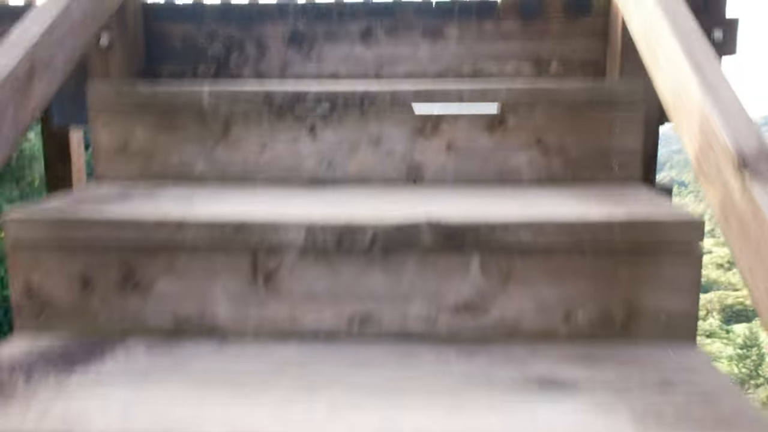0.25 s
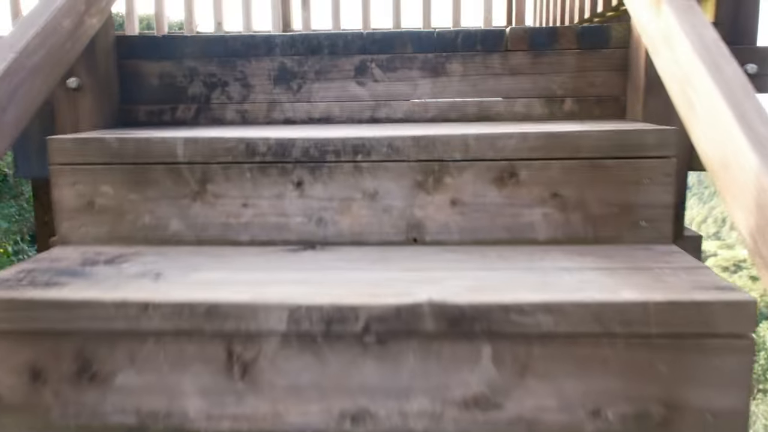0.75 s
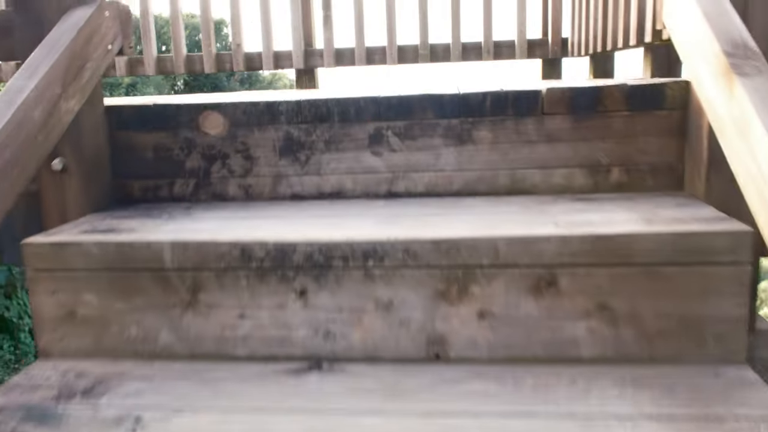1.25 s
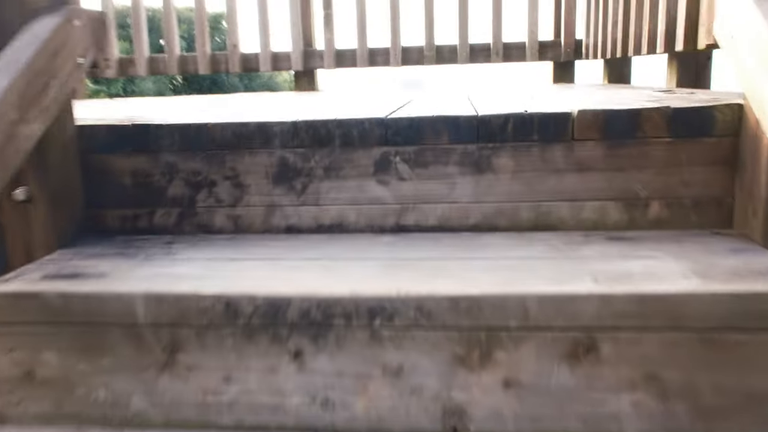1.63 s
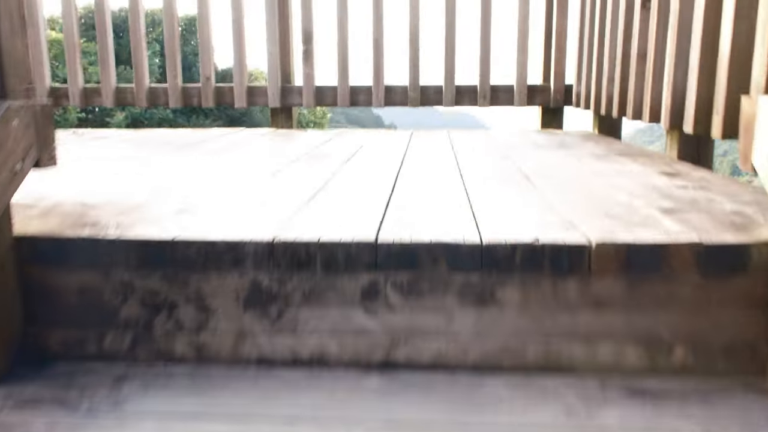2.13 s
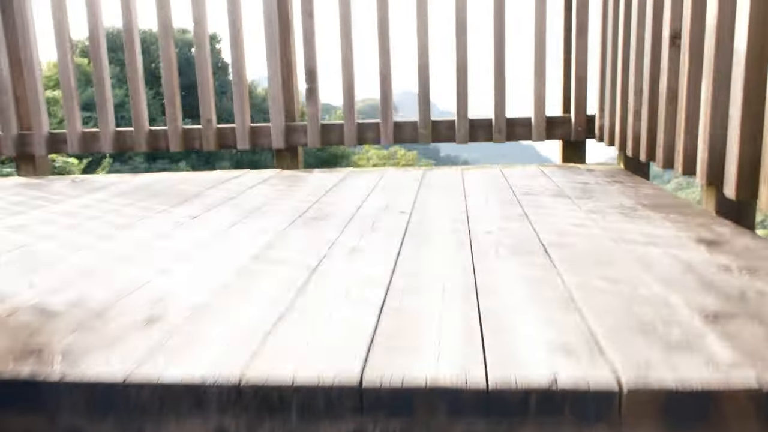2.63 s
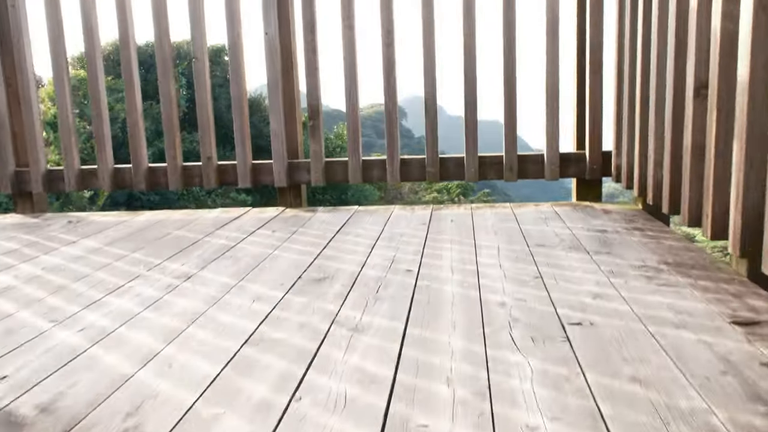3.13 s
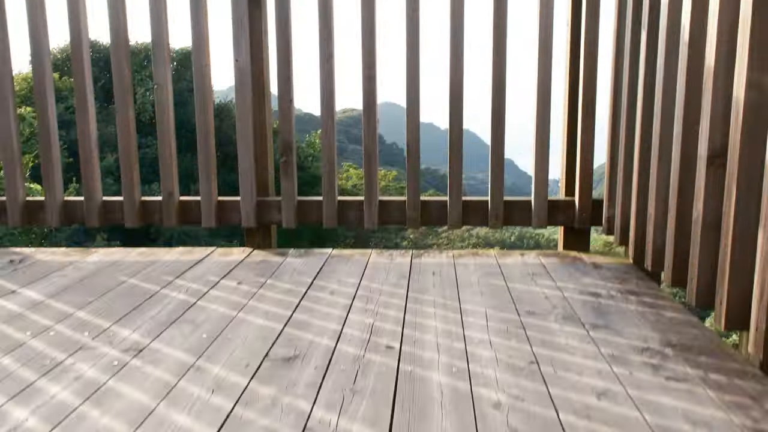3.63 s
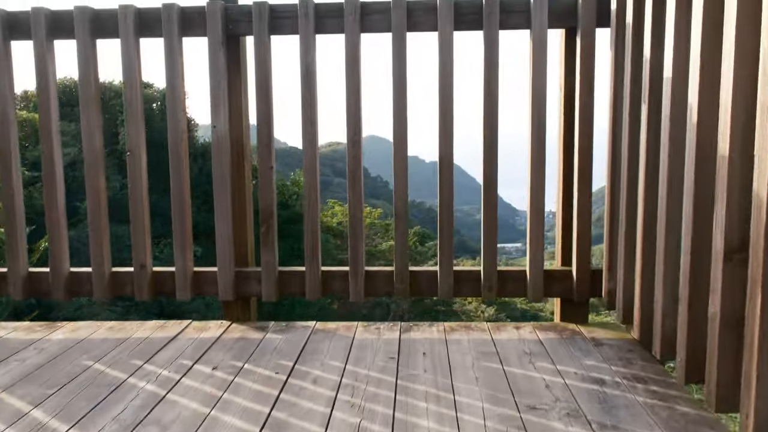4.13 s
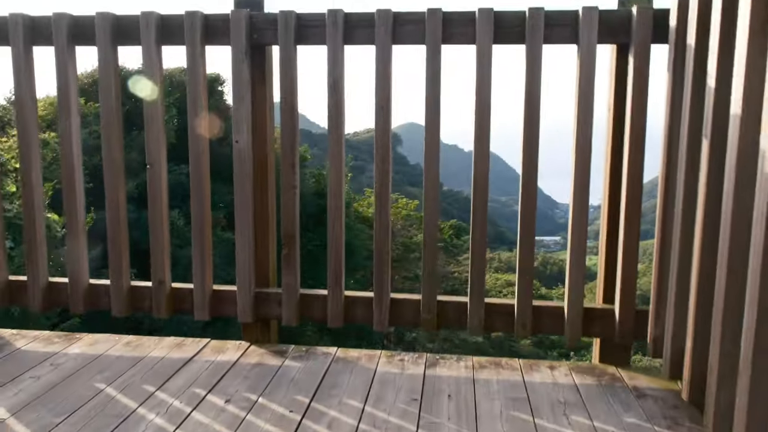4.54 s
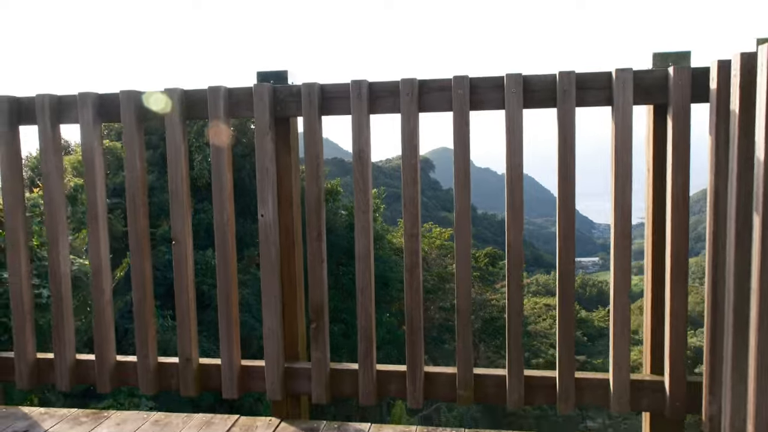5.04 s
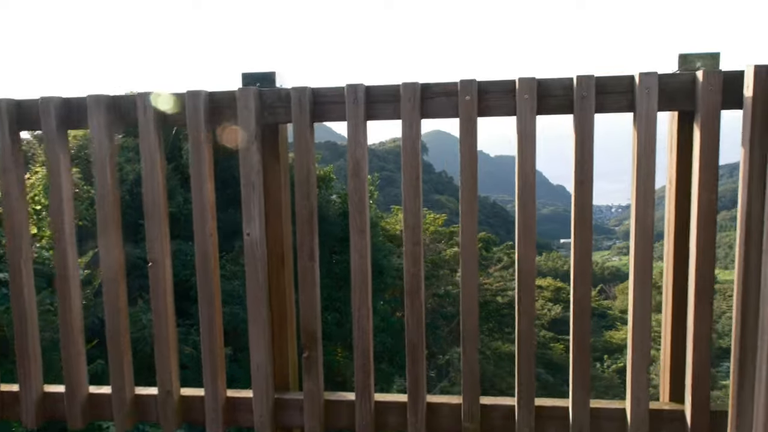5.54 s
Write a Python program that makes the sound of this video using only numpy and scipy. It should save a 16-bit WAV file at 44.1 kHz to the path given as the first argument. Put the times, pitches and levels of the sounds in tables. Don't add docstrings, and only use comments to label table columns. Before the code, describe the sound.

A continuous, bright wall of cicadas lasts the whole six seconds: mid-range drone, hissing buzz, very high whine and rasping bursts, with quick rising calls and small chirps mostly in the first three seconds. A faint scuff on wood comes at 0.1 s, then a heavy, rolling, hollow step on a stair at 0.7 s, with low joist resonance. A light touch leads into a firm step at 1.55 s; a faint brush at 2.2 s precedes the brightest, grittiest knock at 2.36 s. Light scuffs follow around 2.5 to 2.7 s. On the deck, softer steps land at 3.25 and 4.2 s, the latter heel then toe, and a clearer plank step at 5.2 s, with faint scuffs at 5.4 and 5.8 s. A thin, very high ticking insect stops about 4.6 s. A throbbing trill swells from 4.3 to 5.2 s, while another enters near 5 s and continues. The outdoor space is dry, with close, carried-microphone footsteps.

```python
import sys
import numpy as np
from scipy import signal
from scipy.fft import rfft, irfft, next_fast_len
from scipy.io import wavfile
from scipy.ndimage import uniform_filter1d

SR = 44100
rng = np.random.default_rng(int(sys.argv[2]) if len(sys.argv) > 2 else 0)


def file_out(sig):
    cols = np.atleast_2d(sig).T
    lim = np.clip(cols, -1, 1)
    pcm = np.round(lim * 32767).astype(np.int16)
    wavfile.write(sys.argv[1], SR, pcm)


def voltage_ratio(level):
    return 10 ** (np.asarray(level, float) / 20)


N = 255335

# frequency in Hz, density in dB per Hz.
DRONE_SPECTRUM = [(680, -19), (1150, -11.5), (1380, -3.5), (1540, 4.5), (2580, 1.5), (3110, 2.5), (3470, 0),
                  (4000, -3), (5200, -23), (8800, -120)]
BUZZ_SPECTRUM = [(2290, -32), (3900, -8), (5130, 1), (5800, -1), (7050, -7.5), (7560, -12), (8000, -15),
                 (10400, -24), (17600, -120)]
WHINE_SPECTRUM = [(6500, -12.5), (8000, -5), (8700, 0), (9050, 5), (9450, -1.5), (10100, -5), (11000, -6),
                  (12500, -4), (15000, -46)]
RASP_SPECTRUM = [(9000, -28.5), (11000, -13), (12500, -11.5), (14100, -4.5), (15000, -9), (15700, -10)]
# frequency in Hz, density in dB per Hz.
AIR_SPECTRUM = [(30, -4.5), (45, 8), (110, -1.5), (160, -17), (300, -14), (700, -19.5), (1200, -21.5),
                (1500, -69), (2500, -80)]
SWAY_SPECTRUM = [(4, -22), (10, -7), (17, 0.5), (22, -10.5), (28, -16.5), (40, -54), (80, -100)]

# frequency in Hz, width in Hz, level in dB.
FOOTFALLS = [
    ([(0.13, -24.5, 1.6, 0.037)], [(390, 37, -1), (550, 65, 2), (680, 58, 1.5), (900, 170, 1), (1500, 400, -12)]),
    ([(.7185, -12, 2, 0.0048), (.7202, -12, 3.1, 0.008), (.7228, -11.5, 1.6, 0.005), (.7315, -18, 2.8, .004), (.7365, -13, 0.93, 0.021), (.7405, -28, 1.8, 0.012), (.7475, -18, 2.7, 0.0061), (.7635, -28, 4, .005)], [(213, 98, -4.5), (345, 65, 5), (420, 60, -3), (476, 29, 0.5), (610, 82, -5), (705, 37, -10), (780, 63, -13), (930, 44, 4), (1200, 110, -6), (1415, 69, 4.5), (1860, 160, -2), (2460, 340, -1.5), (3460, 760, -6)]),
    ([(1.464, -30.5, 1.2, 0.015)], [(507, 44, -2), (815, 120, 9), (1040, 150, 7)]),
             ([(1.5443, -17, 2, 0.003), (1.548, -21, 0.98, 0.0054), (1.5555, -16, 1.6, 0.0059), (1.56, -14, 0.73, 0.0048), (1.5665, -24, 1.8, 0.008), (1.572, -36, 2.7, 0.0072)], [(251, 27, 2.5), (338, 61, 1.5), (420, 62, -1), (543, 48, 4.5), (592, 87, -1), (975, 140, 1), (1530, 230, 5), (1830, 210, 6), (2300, 300, 0), (2900, 400, -7)]),
    ([(2.187, -37.5, 2.6, 0.006)], [(300, 120, 4), (420, 120, 2)]),
    ([(2.36, -13.5, 1.1, 0.0025), (2.3648, -12.5, 0.55, 0.0051), (2.3685, -10.5, 0.59, 0.0035), (2.3715, -16, 0.98, 0.0073), (2.376, -24, 1.5, .005), (2.3805, -15, 1.4, 0.003), (2.3875, -28, 2.2, .005), (2.3925, -22.5, 1.7, .005), (2.398, -28, 2.8, 0.0089), (2.411, -34, 3.4, 0.0057)], [(353, 26, -9), (457, 34, 2), (510, 56, 2), (615, 77, 6), (703, 75, 5.5), (816, 81, 6), (877, 42, 7.5), (954, 80, 10.5), (1220, 150, 2), (1690, 440, 2.5), (2710, 240, -1), (4100, 1200, -9)]),
             ([(2.519, -36, 3, 0.008), (2.657, -28, 0.85, 0.011)], [(900, 130, 3.8), (1190, 330, 9.4)]),
    ([(3.2485, -19, 3.4, 0.0081), (3.26, -19, 0.89, 0.013), (3.267, -16.5, 0.46, 0.0058), (3.285, -27, 3.9, .012)], [(300, 81, 0), (420, 44, 0), (530, 58, -5), (730, 60, 3.5), (950, 130, -3), (1240, 92, 2), (1500, 120, 7), (1820, 250, 5)]),
    ([(4.2195, -20.5, 0.69, 0.024), (4.2805, -25.5, 4.8, 0.0061)], [(300, 140, -10), (420, 57, 2.5), (495, 53, 1), (744, 70, 2.5), (1040, 800, -12), (1440, 180, 5)]),
             ([(5.2135, -22.5, 4.1, 0.0092), (5.222, -20, 0.95, 0.013), (5.2285, -25, 1.1, .004), (5.2322, -13.5, 0.89, 0.005), (5.239, -24, 1.3, 0.006)], [(236, 35, 2), (370, 220, -1.5), (480, 51, 2), (660, 69, 4), (920, 180, -9), (1190, 180, 5), (1460, 170, 0), (1800, 350, 0), (2900, 400, -9)]),
    ([(5.382, -31.5, 1.7, 0.041), (5.776, -40, 2.6, 0.013)], [(350, 240, -19), (560, 140, 6), (895, 210, -7), (1180, 200, -6)]),
]
# frequency in Hz, decay time t60 in seconds.
RAIL_DECAY = [(60, 0.57), (250, 0.28), (500, 0.18), (1000, 0.041), (4000, 0.052)]
# (frequency in Hz, level in dB, t60 in seconds).
JOISTS = [(.07, [(100, -42.5, 0.52), (128, -38.5, 0.31)]), (0.722, [(66.7, -35, .59), (124.4, -22, 0.75),
          (139.8, -25, 0.81), (179, -25, 0.19)]), (1.55, [(60.5, -33, 0.47), (95, -30.5, 0.42),
          (122, -28, 0.32), (147, -28, 0.21), (193, -39, 0.29)]), (2.189, [(94, -42.5, 0.35),
          (117.4, -40, 0.33), (210, -32, 0.064)]), (2.362, [(57.7, -33.5, 0.41), (102, -25, 0.22),
          (122.3, -32.5, 0.45), (226, -40, 0.22)]), (3.251, [(76, -29.5, 0.99), (103.3, -33, 0.82),
          (131, -33.5, 0.44), (180, -28.5, 0.12), (228, -22.5, 0.084), (280, -29, 0.062)]),
          (4.222, [(91, -31, 0.22), (202, -30.5, 0.1)]), (4.282, [(226, -50, .12)]),
          (4.873, [(203, -46.5, 0.13)]), (5.221, [(68, -41, .3), (88, -28.5, 0.6), (117.5, -27.5, 0.71)]),
          (5.387, [(193, -33, 0.071)]), (5.764, [(110, -42, 0.27), (190, -46, 0.14)])]
# centre in seconds, level over rest in dB.
SWINGS = [(0, 15), (.5, 4.5), (.855, 18.5), (1.1, 0.5), (1.39, 6), (1.62, 7), (1.79, 11.5), (1.92, 5),
          (2.36, 5.5), (2.49, 11.5), (2.9, 3.5), (3.05, 7.5), (3.44, 10), (4.0, 8), (4.34, 11.5),
          (4.58, 7.5), (4.7, 9), (5.0, 3.5), (5.3, 7), (5.42, 8.5), (5.51, 8), (5.72, 1)]

# swell (time in seconds, level in dB); click rate in Hz, its drift in Hz per
# second, lowest multiple, throbs per second, peak of one throb in seconds; level of each multiple in dB.
SINGERS = [
    ([(4.18, -30), (4.3, -10), (4.42, -2), (4.56, 2), (4.95, 1), (5.12, -5), (5.22, -30)], (205.8, 1.5, 22, 15.25, 4.79), [-41.5, -64, -37, -49, -44, -46, -51, -47]),
    ([(4.95, -30), (5.08, -4), (5.3, -1), (5.5, 0.5), (5.6, 1.5), (5.79, -2)], (199.7, 0, 21, 14.7, 5.462), [-49, -71, -40, -46, -39, -50, -41, -50, -47, -41.5, -65, -56]),
    ([(0, -2), (.6, 0), (1.2, -3), (2.5, 1.5), (3.6, 1), (4.3, -9), (4.6, -30)], (210, 0, 22, 15.6, 1), [-61, -50.5, -73, -54, -54, -45.5, -45, -60]),
]
# start in seconds, length in seconds, level over the rest in dB.
RASP_BURSTS = [(.3, 0.42, 3.5), (.46, 0.087, 2.5), (.77, .28, 3), (1.24, .2, 2.5), (1.5, 0.5, 2.5),
               (2.0, 0.44, 3.5), (2.198, 0.18, 3), (2.62, 0.3, 2), (3.08, .09, 2.5), (3.23, .17, 6.5),
               (3.45, .04, 0), (3.57, 0.41, 3.5), (4.017, 0.33, 3.5), (4.662, 0.17, 7.5),
               (4.883, 0.24, 5.5), (5.135, 0.3, 4.5), (5.7, .2, 5)]
# start in seconds, length in seconds, from Hz, to Hz, level in dB.
RISERS = [(.102, 0.2, 1548, 1830, -37.5), (0.285, 0.037, 1790, 2910, -36), (0.232, 0.1, 3160, 3690, -40),
          (0.336, 0.071, 3580, 3360, -42), (0.505, 0.091, 2320, 2820, -38), (0.559, 0.25, 1500, 2095, -38),
          (1.103, 0.21, 1553, 1990, -40), (1.297, 0.17, 1558, 1705, -38.5), (1.492, 0.067, 2310, 3070, -35),
          (1.548, 0.083, 1890, 2510, -37.5), (2.003, 0.25, 1567, 2875, -36.5),
          (2.555, 0.23, 1782, 3140, -35.5), (2.999, 0.11, 1843, 2420, -46), (3.359, 0.27, 1500, 2387, -41),
          (3.686, 0.14, 1990, 3160, -42), (4.702, 0.14, 1964, 2240, -39), (3.903, 0.13, 1558, 1670, -41),
          (4.069, 0.12, 1990, 2860, -38.5), (4.254, 0.13, 3770, 3540, -39)]
# start in seconds, length in seconds, frequency in Hz, level in dB.
NOTES = [
    (.42, .08, 3950, -46),
    (1.332, .088, 3970, -45),
    (2.446, .026, 2640, -35.5),
    (4.7, .095, 10800, -45),
    (4.08, .085, 12820, -47),
    (3.58, .05, 12800, -48),
    (5.03, .1, 1750, -43),
    (5.43, .08, 1580, -42),
    (5.55, .24, 1680, -43),
]
# start in seconds, length in seconds, from Hz, to Hz, level in dB.
SWEEPS = [
    (3.129, 0.12, 7150, 7700, -40),
    (3.24, .07, 7900, 9600, -46),
    (4.191, 0.18, 7100, 7120, -38),
    (5.235, 0.094, 6900, 9150, -43),
    (5.303, .1, 9500, 10050, -43),
    (5.4, .03, 9700, 8700, -43),
]
# start in seconds, level in dB.
CHIRPS = [
    (0.259, -38),
    (.782, -34.5),
    (1.08, -35),
    (1.54, -37.5),
    (1.97, -37),
    (2.635, -39),
]
# centre in seconds, centre in Hz.
WIDE_PATCHES = [(.385, 5730), (.385, 13200), (.94, 8660), (.94, 5200), (1.405, 7000), (1.615, 12500),
                (2.105, 6700), (2.29, 5250), (4.055, 6100), (4.195, 12600), (4.47, 6300), (4.54, 5900),
                (4.725, 6400), (5.005, 5900), (5.26, 13200), (5.495, 12600)]


def unit(x):
    return x / np.sqrt(np.mean(np.abs(x) ** 2) + 1e-20)


def along(points, hz):
    f, v = np.transpose(points)
    return np.interp(np.log(hz + 1), np.log(f + 1), v)


def curves(rows):
    s, *cols = np.transpose(rows)
    return [np.interp(np.arange(N) / SR, s, c) for c in cols]


def wobble(rate, size=N):
    knots = rng.standard_normal(int(size * rate / SR) + 4)
    return np.interp(np.arange(size) * rate / SR, np.arange(len(knots)), knots)


def filtered(x, response):
    m = next_fast_len(len(x) + SR // 8)
    return irfft(rfft(x, m) * response(np.fft.rfftfreq(m, 1 / SR)), m)[:len(x)]


def rush(spectrum, patchy_db):
    z = signal.stft(rng.standard_normal(N + 512), nperseg=512)[2]
    field = uniform_filter1d(rng.standard_normal(z.shape), 4, 0)
    field = uniform_filter1d(field, 10, 1)
    noise = signal.istft(z * voltage_ratio(patchy_db * unit(field)), nperseg=512)[1][:N]
    return unit(filtered(noise, lambda hz: voltage_ratio(along(spectrum, hz))))


def chorus():
    t = np.arange(N) / SR
    bursts_db, edge_s = np.zeros(N), 0.036
    for start, length, db in RASP_BURSTS:
        to_edge = np.minimum(t - start, start + length - t)
        bursts_db += db * np.clip(to_edge / edge_s + .5, 0, 1)
    flutter = 1 + 0.075 * np.sin(2 * np.pi * 31.5 * t + 1.4 * wobble(2.2))
    drone = voltage_ratio(-39 + .6 * wobble(2.64)) * rush(DRONE_SPECTRUM, patchy_db=2.1)
    buzz = voltage_ratio(-35 + 0.63 * wobble(8.6)) * rush(BUZZ_SPECTRUM, patchy_db=1.36)
    rasp = voltage_ratio(-39 + bursts_db + 0.31 * wobble(20)) * flutter * rush(RASP_SPECTRUM, patchy_db=1.5)
    whine_db = -41.5 - 0.86 * t
    whine = voltage_ratio(whine_db) * rush(WHINE_SPECTRUM, patchy_db=.7)
    return drone + buzz + whine + rasp


def trill(swell, train, levels):
    click_hz, drift, lowest, throbs, peak_s = train
    t = np.arange(N) / SR - peak_s
    beat = 2 * np.pi * throbs * t + .2 * wobble(5)
    sag = -.005 * np.cos(beat + .6) + .001 * wobble(5)
    phase = 2 * np.pi * np.cumsum((click_hz + drift * t) * (1 + sag)) / SR
    lines = np.zeros(N)
    for k, db in enumerate(levels):
        lines += voltage_ratio(db + 1.6 * wobble(14)) * np.sin((lowest + k) * phase + 1.05 * wobble(70))
    return voltage_ratio(curves(swell)[0]) * (1 + 0.34 * np.cos(beat)) * lines


def ticker():
    last_s, every_s, low_hz = 4.608, .0705, 14300
    t = np.arange(N) / SR - last_s
    gate = np.clip(np.cos(2 * np.pi * t / every_s), 0, 1) * (t < every_s / 4)
    hiss = unit(filtered(rng.standard_normal(N), lambda hz: hz > low_hz))
    return voltage_ratio(-32 + 2 * t) * gate * hiss


def ground():
    t = np.arange(N) / SR
    settle = np.tanh(t * 30)
    rest_db, half_width_s = -29, 0.067
    swing_db = rest_db + sum(db / (1 + ((t - s) / half_width_s) ** 2) for s, db in SWINGS)
    swing = signal.hilbert(rush(SWAY_SPECTRUM, patchy_db=-0.5), next_fast_len(N))[:N]
    even = (swing / (abs(swing) + .3)).real
    sway = filtered(settle * voltage_ratio(swing_db) * even, lambda hz: 1 / (1 + (hz / 30) ** 4))
    return sway + voltage_ratio(-45.0 + 0.62 * wobble(3.26)) * rush(AIR_SPECTRUM, patchy_db=3.0)


def calls(rows):
    out = np.zeros(N + SR)
    for start, end, from_hz, to_hz, db, rough_hz in rows:
        u = np.linspace(0, 1, round((end - start) * SR))
        pitch_hz = from_hz + (to_hz - from_hz) * u ** 2.0
        tone = np.exp(2j * np.pi * np.cumsum(pitch_hz) / SR)
        jitter_hz = 130 + rough_hz
        strength = 1.2 + .5 * wobble(jitter_hz, len(u))
        fuzz = strength * np.exp(1.45j * wobble(jitter_hz, len(u)))
        out[round(start * SR):][:len(u)] += voltage_ratio(db) * np.sin(np.pi * u) ** 0.12 * (tone * fuzz).real
    return out[:N]


def crowd(count, low_hz, high_hz, rise, db, rough_hz):
    when, long, pitch, size = rng.random((count, 4)).T
    start = when * (N / SR)
    end = start + .07 + 0.2 * long
    hz = low_hz * (high_hz / low_hz) ** pitch ** 1.5
    return np.transpose([start, end, hz, hz * (1 + rise * long), db + 6 * size, rough_hz + 0 * hz])


def joists():
    out, t = np.zeros(N + SR), np.arange(SR // 2) / SR
    onset = 1 - np.exp(-t / 0.0069)
    foot_damping = voltage_ratio(4.5 - (t / 0.074) ** 2)
    for s, modes in JOISTS:
        ring = sum(voltage_ratio(db - 60 * t / t60) * np.sin(2 * np.pi * hz * t) for hz, db, t60 in modes)
        out[round(s * SR):][:len(t)] += foot_damping * onset * ring
    return out[:N]


def soloists():
    risers = [(s, s + long, a, b, db - 3.5, 199.8) for s, long, a, b, db in RISERS]
    notes = [(s, s + long, hz, hz, db, 51) for s, long, hz, db in NOTES]
    sweeps = [(s, s + long, a, b, db, 1040) for s, long, a, b, db in SWEEPS]
    chirps = [(s, s + 0.031, 6300, 6700, db, 1247) for s, db in CHIRPS]
    return risers + notes + sweeps + chirps


def footfall(contacts, board):
    out, t = np.zeros(N + SR), np.arange(SR // 3) / SR

    def wood(f):
        return sum((-1) ** k * voltage_ratio(db) * 1j * f * w / (c * c - f * f + 1j * f * w)
                   for k, (c, w, db) in enumerate(board))

    def slap(f):
        return .45j * f / (250 + 1j * f) / (1 + 1j * f / 5500) ** 2

    for s, db, soft, roll in contacts:
        grit = rng.standard_normal(len(t)) * rng.exponential(size=len(t))
        force = 0.062 * grit * np.exp(-t / roll * 2)
        force[0] += 1
        knock = filtered(force, lambda f: (wood(f) + slap(f)) / (1 + 1j * f / 800) ** soft)
        out[round(s * SR) - 20:][:len(t)] += voltage_ratio(db) * knock / np.abs(knock).max()
    return out[:N]


def rails(x):
    hz, t, z = signal.stft(rng.standard_normal(SR // 2), SR, nperseg=256)
    decay = voltage_ratio(-60 * t / along(RAIL_DECAY, hz)[:, None])
    tail = signal.istft(z * decay, SR, nperseg=256)[1]
    first = np.flatnonzero(x)[0]
    answer = signal.fftconvolve(x[first:][:SR], tail / np.linalg.norm(tail))
    return np.pad(answer, (first + 300, N))[:N]


def wide_patches():
    out, size, width_hz = np.zeros(N), 2048, 1600
    for s, centre_hz in WIDE_PATCHES:
        band = filtered(rng.standard_normal(size), lambda hz: abs(hz - centre_hz) < width_hz / 2)
        out[round(s * SR) - size // 2:][:size] += voltage_ratio(-40.5) * np.hanning(size) ** 2 * unit(band)
    return out


def scene():
    steps = [footfall(*step) for step in FOOTFALLS]
    walk = sum(x + voltage_ratio(-13) * rails(x) for x in steps) + joists()
    risers = crowd(count=90, low_hz=1500, high_hz=3000, rise=.4, db=-55.5, rough_hz=110)
    streaks = crowd(count=70, low_hz=9900, high_hz=14600, rise=0.01, db=-60, rough_hz=350)
    singers = sum(trill(*singer) for singer in SINGERS)
    insects = chorus() + ticker() + calls([*soloists(), *risers, *streaks]) + singers
    return np.tile(walk + insects + ground(), (2, 1))


def band_limit(x):
    return signal.sosfilt(signal.butter(12, 15710, fs=SR, output="sos"), x)


def record(dry):
    hiss_spectrum = [(60, -66), (200, 3.5), (1000, 0), (1400, -16.0), (16000, -23.0)]  # (Hz, dB per Hz)
    hiss = voltage_ratio(-70.0) * rush(hiss_spectrum, patchy_db=-2.5) + wide_patches()
    offset = .0014
    return band_limit(dry + offset + np.array([hiss, -hiss]))


dry = scene()
out = record(dry)
file_out(out)
```